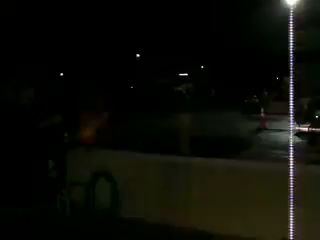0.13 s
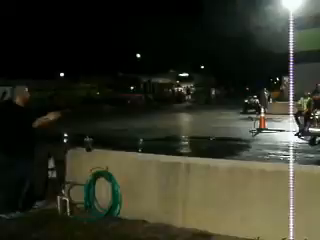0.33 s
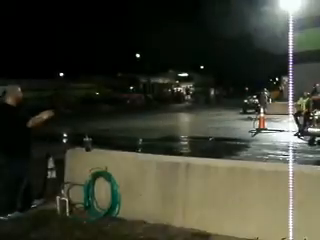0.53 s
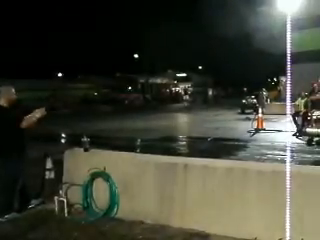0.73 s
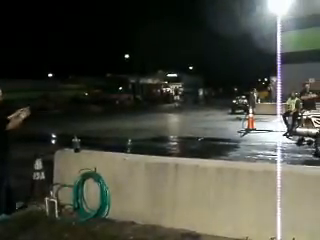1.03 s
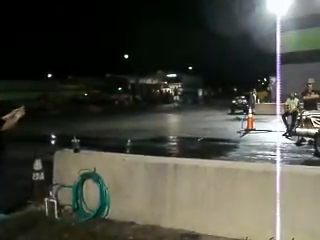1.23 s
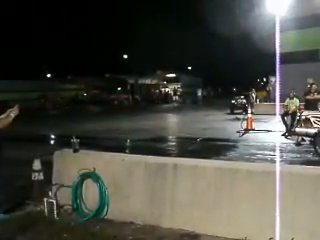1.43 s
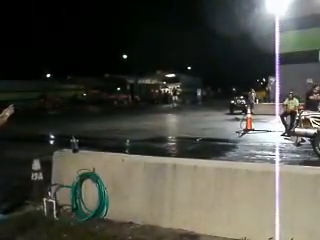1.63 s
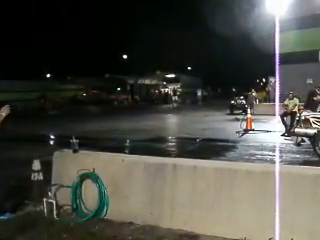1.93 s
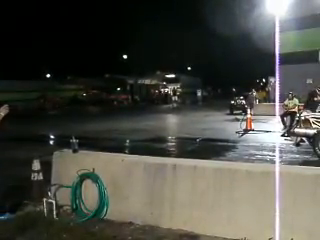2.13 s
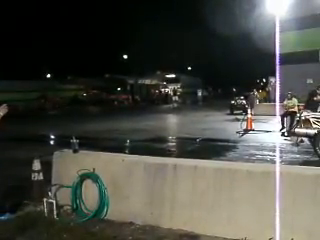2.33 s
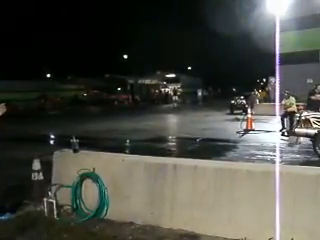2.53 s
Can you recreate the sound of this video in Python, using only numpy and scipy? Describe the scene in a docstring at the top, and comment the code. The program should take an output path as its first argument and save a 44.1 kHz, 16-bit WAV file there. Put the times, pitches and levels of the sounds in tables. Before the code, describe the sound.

A jet engine on an outdoor strip opens with a rough afterburner roar that flares and cuts out, its rumble stopping shortly after, leaving a shrill fluttering whine, hiss and steady rush through a harsh, narrow-band camera microphone.

```python
"""The turbine of a standing jet dragster: the compressor whine creeps up in pitch and flutters.
An afterburner flame roars, flares and cuts out early on; its rumble fades more slowly, then stops.
Whine and shaft tones are sines on the spool speed; intake hiss, jet rush, exhaust drone and flame are
shaped noise. A narrow-band camera clips the peaks, cuts the treble and mirrors some of it above its edge."""
import sys
import numpy as np
from scipy import signal
from scipy.fft import rfft, irfft
from scipy.io import wavfile
from scipy.ndimage import uniform_filter1d

SR = 44100
rng = np.random.default_rng(int(sys.argv[2]) if len(sys.argv) > 2 else 0)


def dump(signal):
    """Clip the signal to [-1, 1] and save it as 16-bit WAV at the path in sys.argv[1]."""
    limited = np.clip(np.atleast_2d(signal).T, -1, 1)
    pcm = np.round(limited * 32767).astype(np.int16)
    wavfile.write(sys.argv[1], SR, pcm)


N = 117747
CAMERA_RATE_HZ = 8000

# spool speed as the compressor's blade tone: (time [s], frequency [Hz])
SPOOL_HZ = [(0, 2678), (.38, 2676), (.88, 2708), (1.15, 2724), (1.45, 2742), (1.9, 2748), (2.67, 2756)]


def undb(db):
    """Decibels to amplitude gain."""
    return 10 ** (np.asarray(db) / 20)


def curve(rows, at):
    """Straight lines between the rows, end values held."""
    return np.interp(at, *np.array(rows, float).T)


def walk(rate_hz):
    """Random levels held 1 / rate_hz s, smoothed by two moving averages; zero mean, unit spread."""
    hold = int(SR / rate_hz)
    steps = np.repeat(rng.standard_normal(N // hold + 1), hold)
    slewed = uniform_filter1d(uniform_filter1d(steps, hold), hold)[:N]
    return (slewed - slewed.mean()) / slewed.std()


def noise(spectrum):
    """Turbulence: white noise shaped to the spectrum below half the camera rate, unit rms."""
    hz, db = np.array(spectrum, float).T
    f = np.maximum(np.arange(N // 2 + 1) * SR / N, 1)
    gain = undb(np.interp(np.log(f), np.log(hz), db))
    gain = gain * (f < CAMERA_RATE_HZ / 2)
    x = irfft(rfft(rng.standard_normal(N)) * gain, N)
    return x / x.std()


def tone(hz):
    """Unit-rms sine on a moving pitch, random start phase."""
    cycles = np.cumsum(hz) / SR + rng.random()
    return np.sqrt(2) * np.sin(2 * np.pi * cycles)


def afterburner(t):
    """Uneven burning roars, flares and goes out; the rumble fades more slowly, then stops."""
    # flame roar: (frequency [Hz], relative density [dB per Hz])
    roar_spectrum = [(60, -15), (150, 0), (240, -1.5), (350, -8), (500, -7.5), (720, -14), (1050, -10.5),
                     (1600, -13.5), (2500, -17), (3900, -22)]
    # flame rumble: (frequency [Hz], relative density [dB per Hz])
    rumble_spectrum = [(15, -24), (30, -7), (48, 1.5), (75, -.5), (118, .5), (155, -6), (250, -22),
                       (600, -45)]
    cut_s, flare_db, flare_s = .178, 7, .016
    drop_db, drop_s, roar_fade_db_per_s = 6.5, .035, 48
    rumble_fade_db_per_s, rumble_end_s, release_s = 14, .44, .014

    after_s = np.maximum(t - cut_s, 0)
    roar_db = -15.5 + flare_db * np.exp(-((t - cut_s) / flare_s) ** 2)
    roar_db -= drop_db * np.minimum(after_s / drop_s, 1) + roar_fade_db_per_s * after_s
    roar_db += 1.3 * walk(90)  # uneven burning
    roar = noise(roar_spectrum) * undb(roar_db)

    rumble_db = -17 - rumble_fade_db_per_s * after_s
    release = np.exp(-np.maximum(t - rumble_end_s, 0) / release_s)
    rumble = noise(rumble_spectrum) * undb(rumble_db) * release
    return roar + rumble


def compressor(t):
    """The blade tone follows the spool and flutters in the hot air; the intake blades hiss around it."""
    # whine swelling and fading in the air: (time [s], level [dB])
    whine_level = [(0, -22.5), (.14, -22.5), (.21, -26), (.45, -21), (.69, -18), (.75, -21), (.84, -17),
                   (.95, -20.5), (1.05, -16.5), (1.14, -23.5), (1.32, -24), (1.39, -20), (1.62, -26.5),
                   (1.9, -22.5), (2.12, -21), (2.35, -24), (2.42, -32.5), (2.49, -23.5)]
    # intake hiss: (frequency [Hz], relative density [dB per Hz])
    hiss_spectrum = [(2000, -40), (2550, -19), (2780, -5), (3020, -6), (3230, 0), (3450, 0.5), (3650, -2.5),
                     (3780, -1), (3920, -3.5)]
    # intake hiss: (time [s], level [dB])
    hiss_level = [(0, -19.5), (.4, -20), (1.0, -19), (1.7, -18.5), (2.67, -20)]
    pitch_jitter, whine_flutter_db, hiss_flicker_db = .0006, 1.1, .55  # jitter as a share of pitch

    blade_hz = curve(SPOOL_HZ, t) * (1 + pitch_jitter * walk(60))
    whine_db = curve(whine_level, t) + whine_flutter_db * walk(25)
    hiss_db = curve(hiss_level, t) + hiss_flicker_db * walk(40)
    return tone(blade_hz) * undb(whine_db) + noise(hiss_spectrum) * undb(hiss_db)


def shaft(t):
    """Faint tones at multiples of the shaft rate, wavering in pitch and level."""
    # shaft tones: (multiple of the shaft rate [-], level [dB])
    orders = [(1, -44), (10, -40), (11, -37.5), (12, -43)]
    end_hz, pitch_jitter, flutter_db = 120.5, .003, 3.0  # end_hz: shaft rate at full spool

    shaft_hz = end_hz * curve(SPOOL_HZ, t) / SPOOL_HZ[-1][1]
    total = np.zeros(N)
    for order, db in orders:
        hz = round(order) * shaft_hz * (1 + pitch_jitter * walk(30))
        total += tone(hz) * undb(db + flutter_db * walk(7))
    return total


def exhaust(t):
    """Jet turbulence: a steady, slightly flickering rush over a low drone."""
    # jet rush: (frequency [Hz], relative density [dB per Hz])
    rush_spectrum = [(30, -22.5), (160, -10.5), (240, -8), (380, -10), (600, -7.5), (840, -11),
                     (1000, -4.5), (1230, -2), (1500, -6), (1850, -7.5), (2200, -2.5), (2550, -5),
                     (3900, -12.5)]
    # exhaust drone: (frequency [Hz], relative density [dB per Hz])
    drone_spectrum = [(20, -26), (35, -18), (50, -8), (66, 0), (86, 0), (102, -8), (125, -11), (170, -27),
                      (400, -50)]
    # exhaust drone: (time [s], level [dB])
    drone_level = [(0, -31), (.7, -32), (1.1, -33), (1.25, -29.5), (1.9, -28.5), (2.15, -33), (2.67, -30.5)]
    rush_db = -22 + .55 * walk(20)
    rush = noise(rush_spectrum) * undb(rush_db)
    drone = noise(drone_spectrum) * undb(curve(drone_level, t))
    return rush + drone


def scene():
    """All parts of the engine summed at one microphone."""
    t = np.arange(N) / SR
    return (afterburner(t) + compressor(t) + shaft(t) + exhaust(t))[None]


def record(dry):
    """Microphone stage clips, treble is cut, an image mirrors about half the camera rate, output clips."""
    overload, full_scale = .66, .69
    edge_hz, top_hz = 3935, 15800
    image_db, image_db_per_hz, image_knee_hz = -4, .027, 480  # slope at the mirror; it steepens above

    f = np.arange(N // 2 + 1) * SR / N
    clipped = np.clip(dry, -overload, overload)
    band = irfft(rfft(clipped) * (f < edge_hz), N)

    mirrored = 2 * band * np.cos(2 * np.pi * CAMERA_RATE_HZ * np.arange(N) / SR)
    above_hz = np.maximum(f - CAMERA_RATE_HZ / 2, 0)
    gain_db = image_db - image_db_per_hz * above_hz * (1 + above_hz / image_knee_hz)
    image = irfft(rfft(mirrored) * undb(gain_db), N)

    out = np.clip(band + image, -full_scale, full_scale)
    low_pass = signal.ellip(8, .2, 70, top_hz, fs=SR, output="sos")
    return signal.sosfilt(low_pass, out)


dry = scene()
out = record(dry)
dump(out)
```